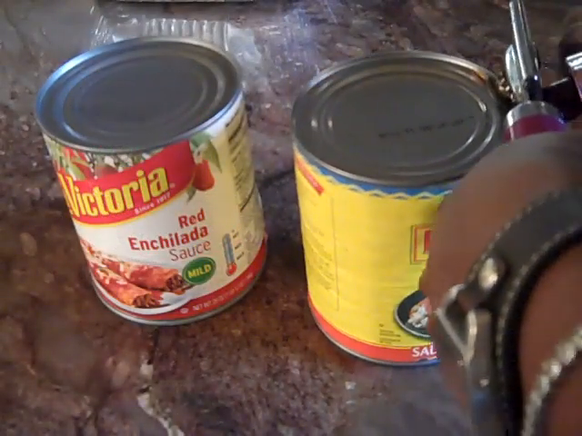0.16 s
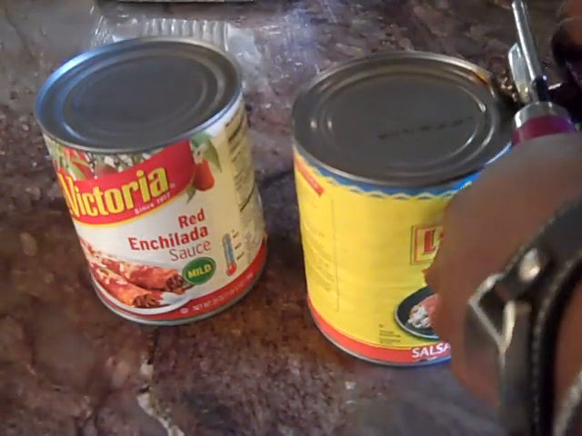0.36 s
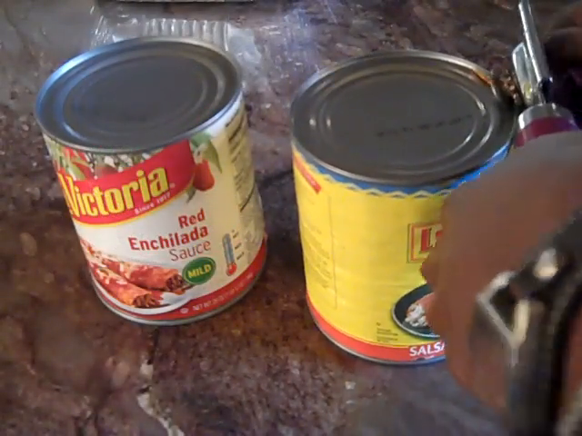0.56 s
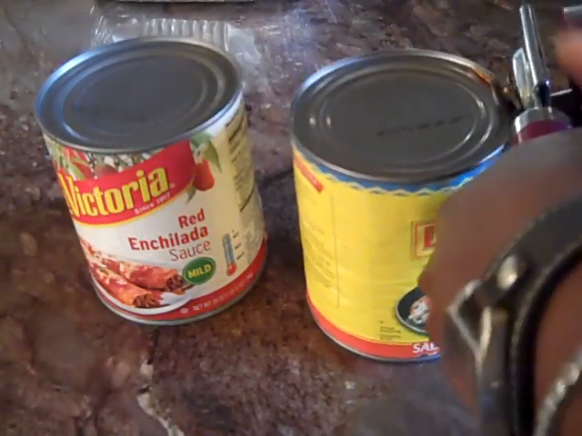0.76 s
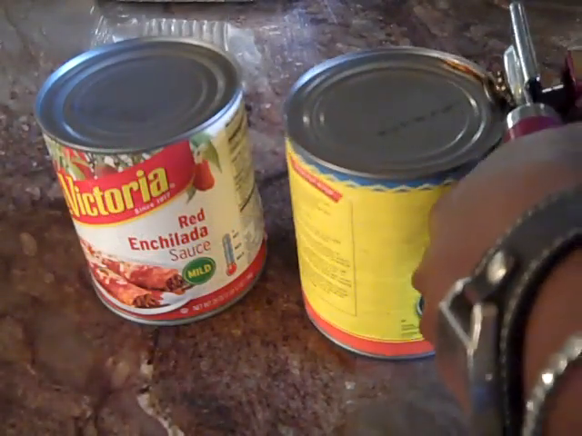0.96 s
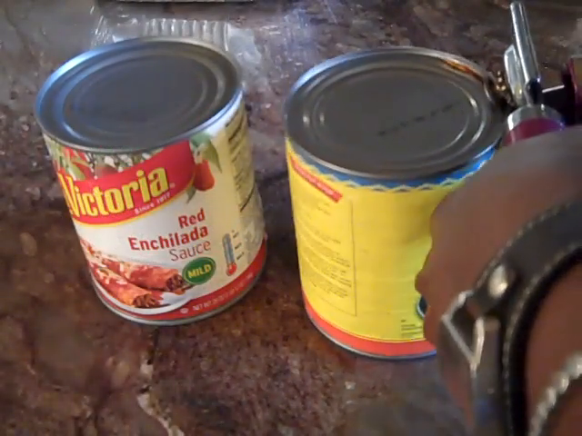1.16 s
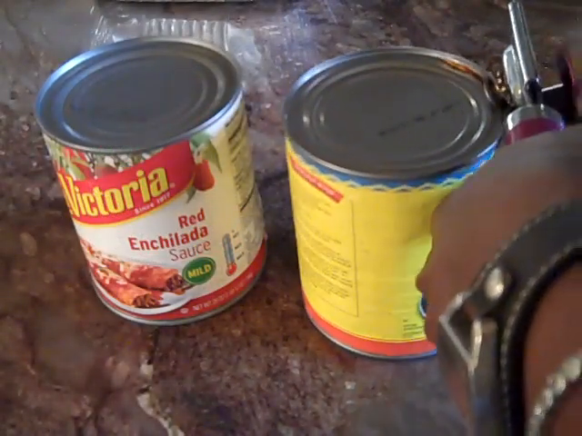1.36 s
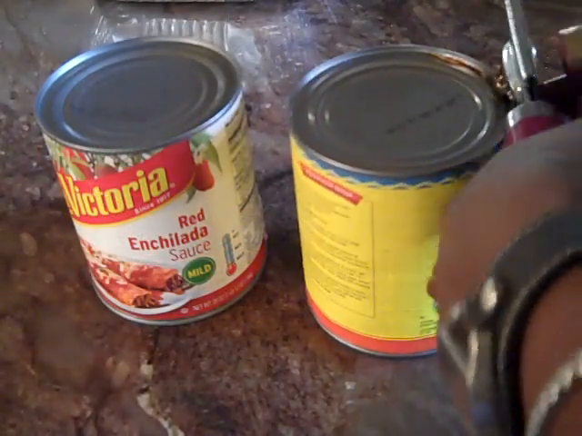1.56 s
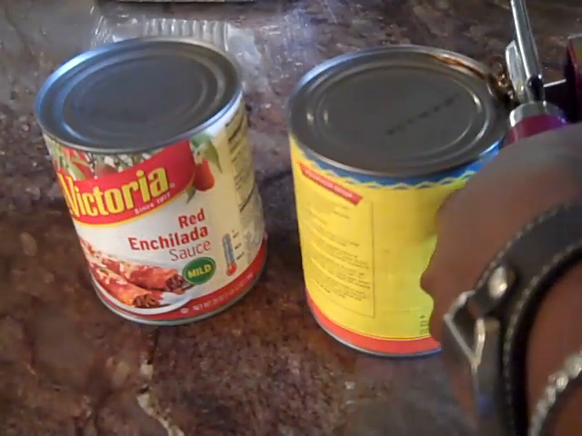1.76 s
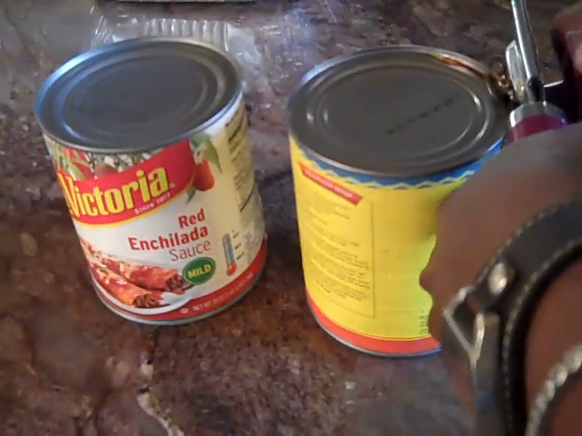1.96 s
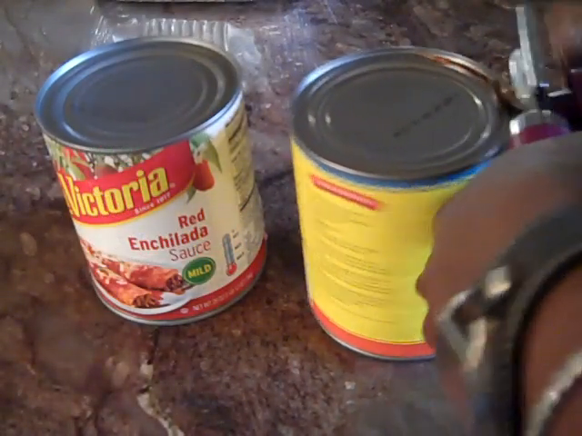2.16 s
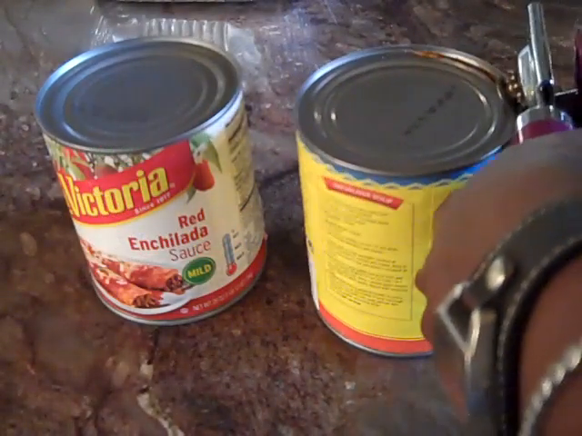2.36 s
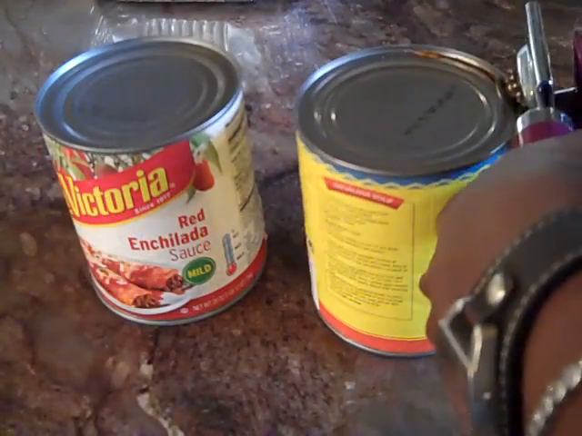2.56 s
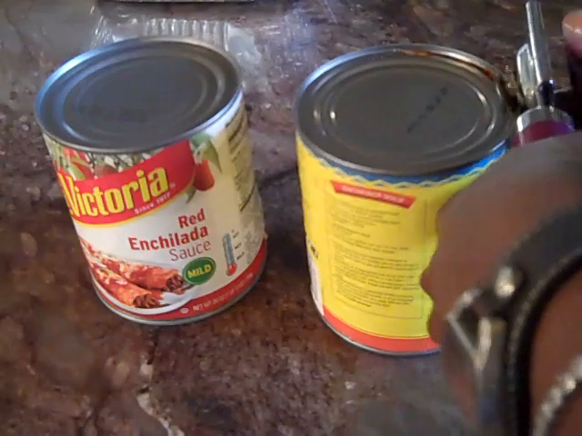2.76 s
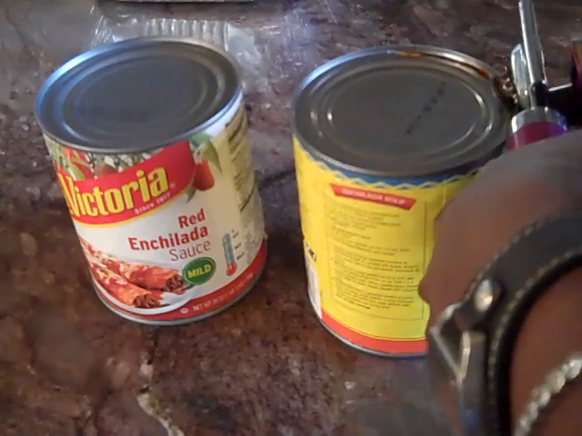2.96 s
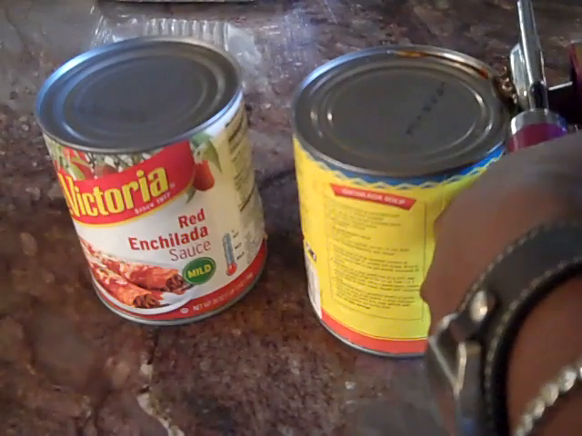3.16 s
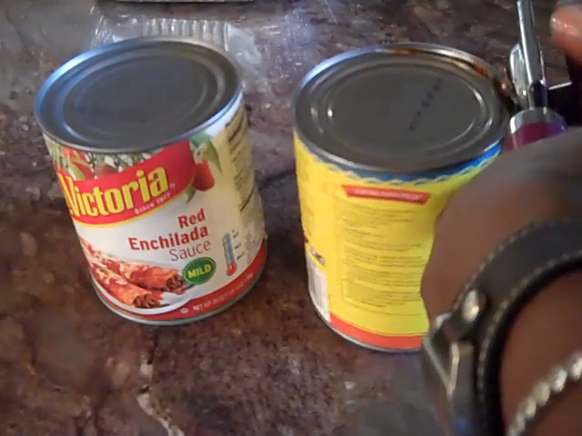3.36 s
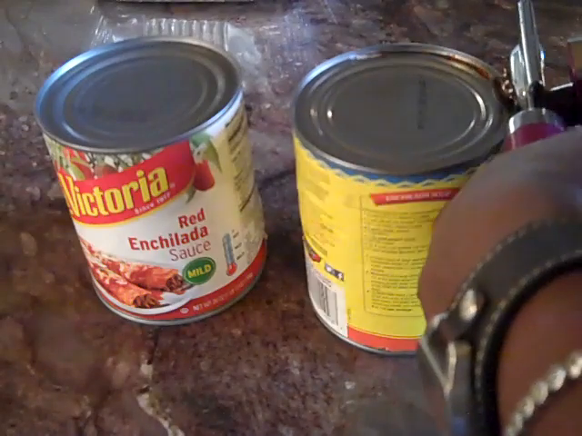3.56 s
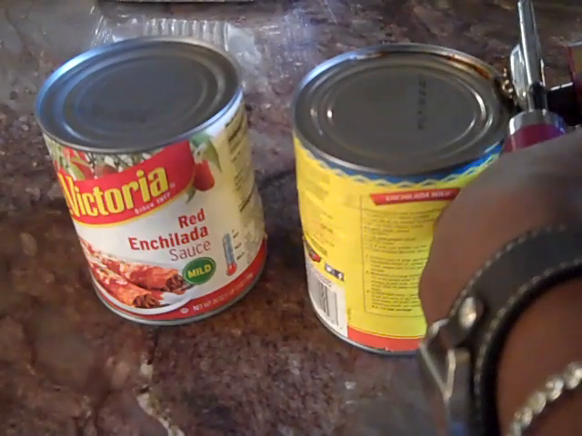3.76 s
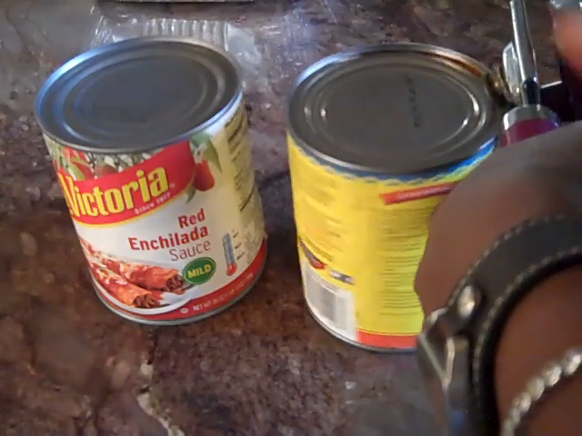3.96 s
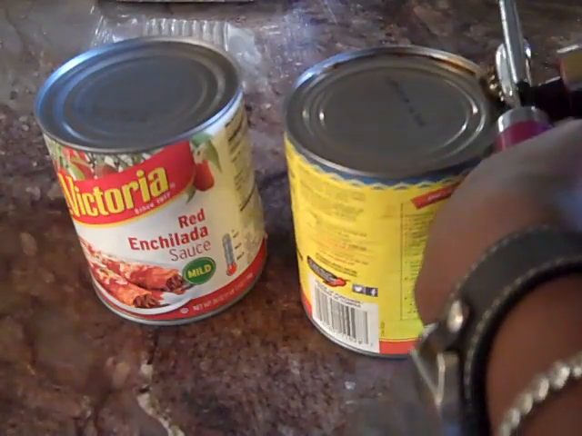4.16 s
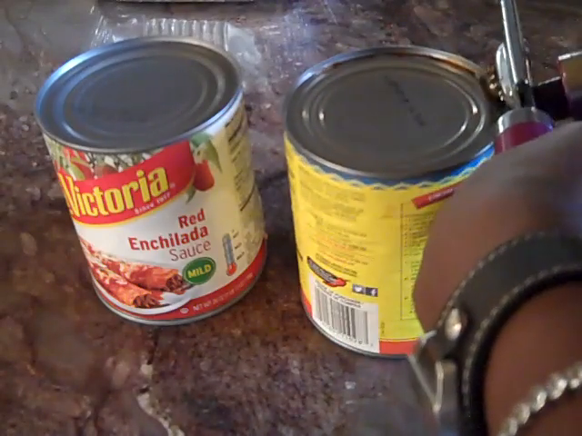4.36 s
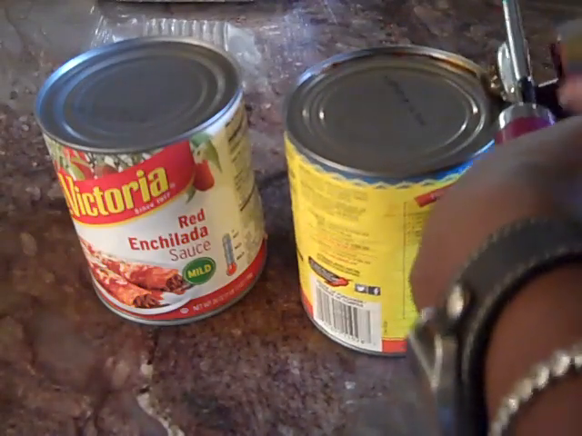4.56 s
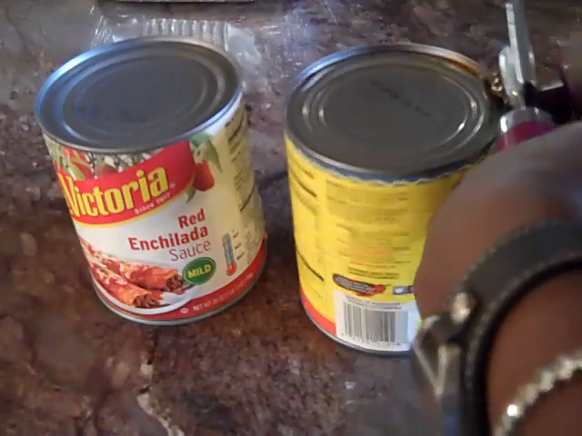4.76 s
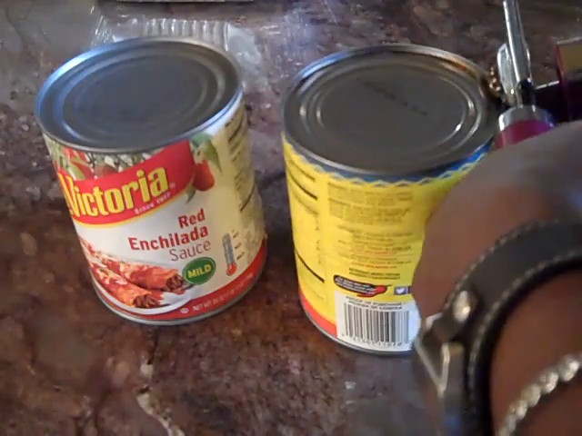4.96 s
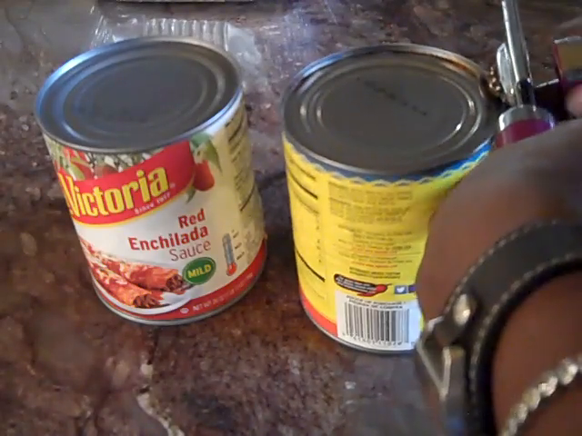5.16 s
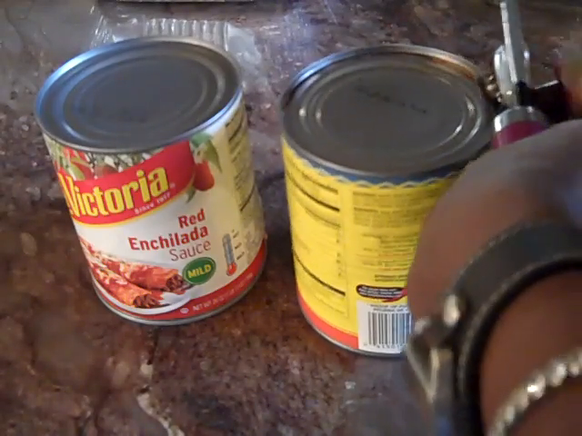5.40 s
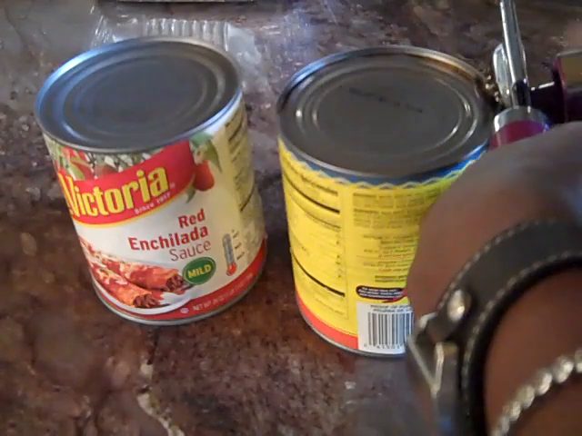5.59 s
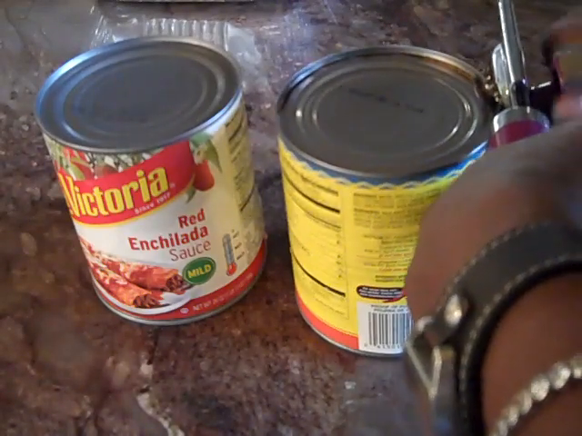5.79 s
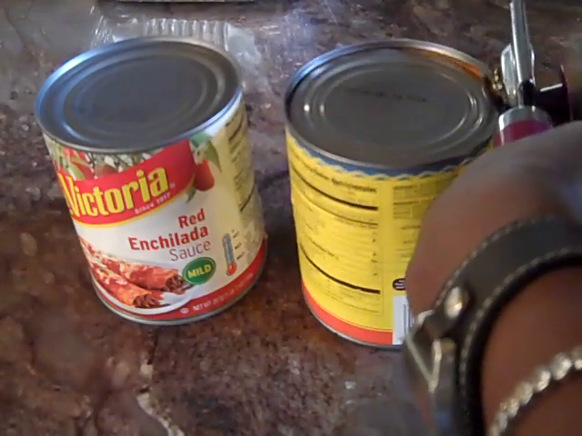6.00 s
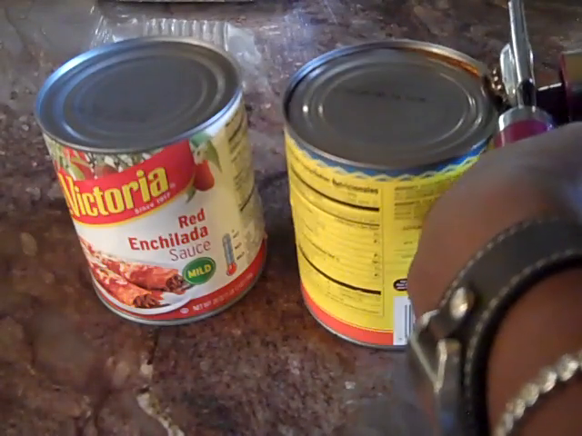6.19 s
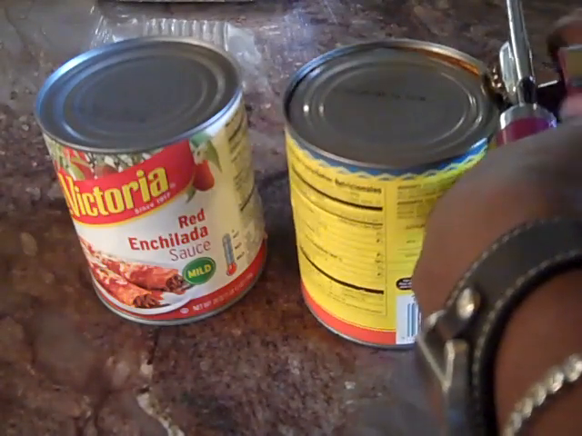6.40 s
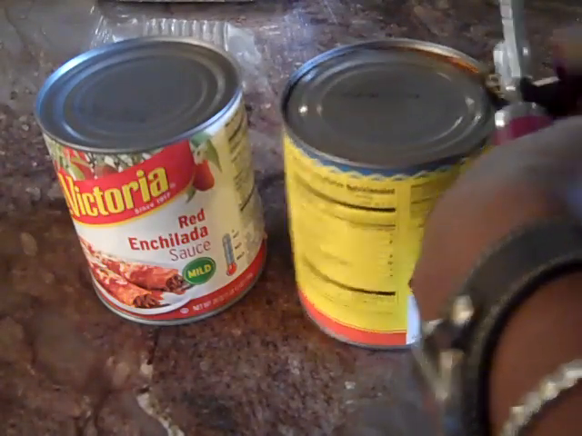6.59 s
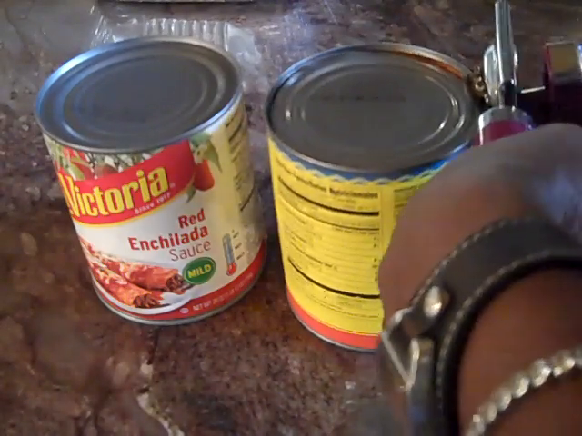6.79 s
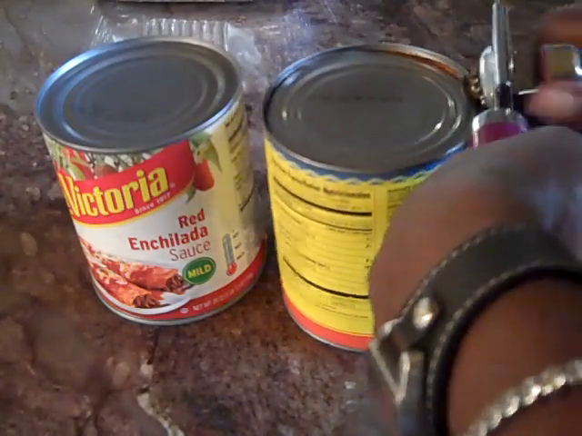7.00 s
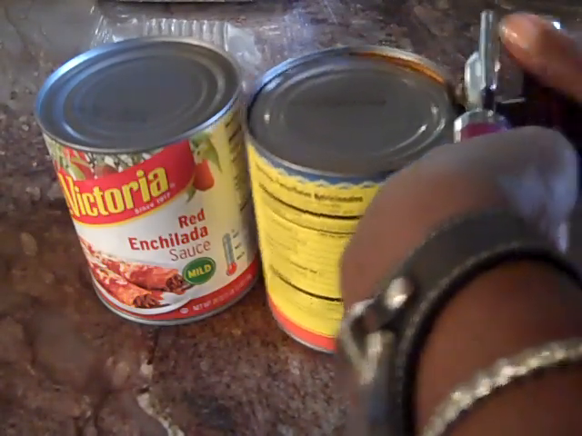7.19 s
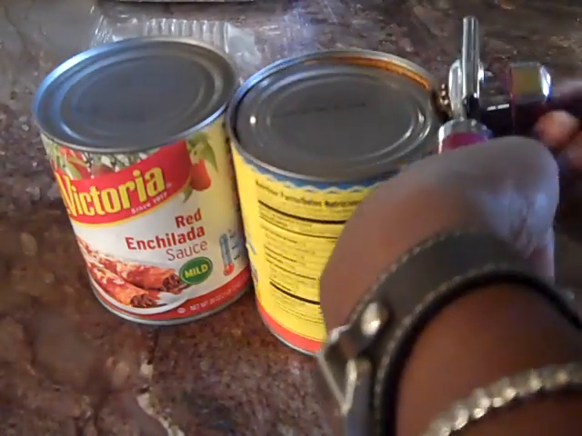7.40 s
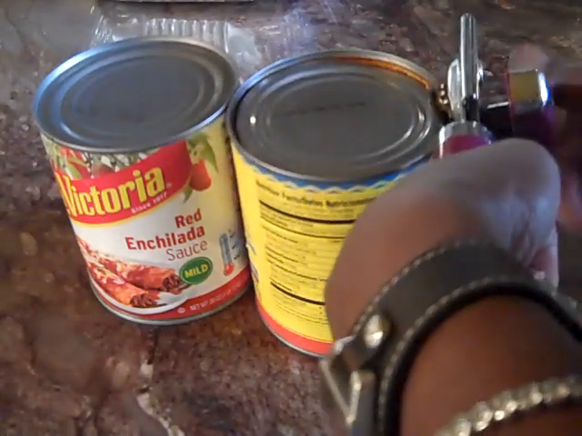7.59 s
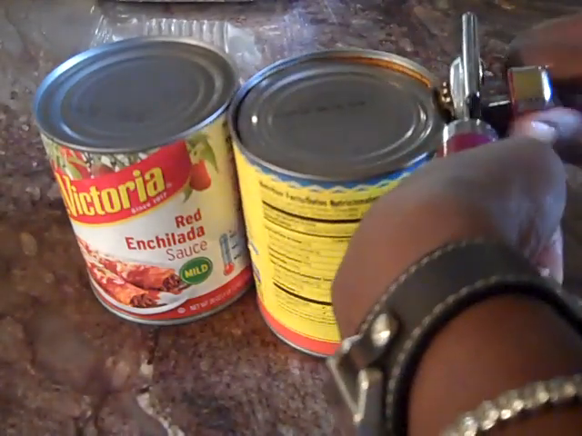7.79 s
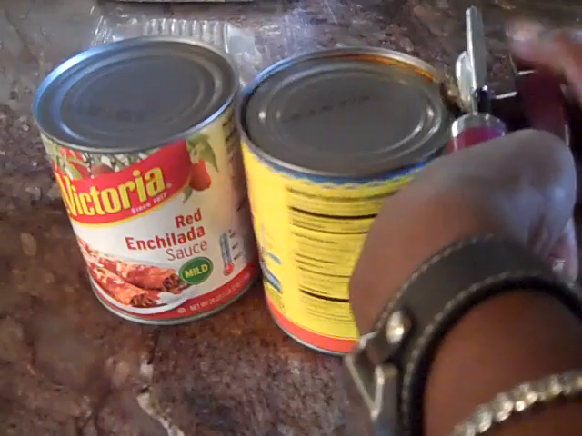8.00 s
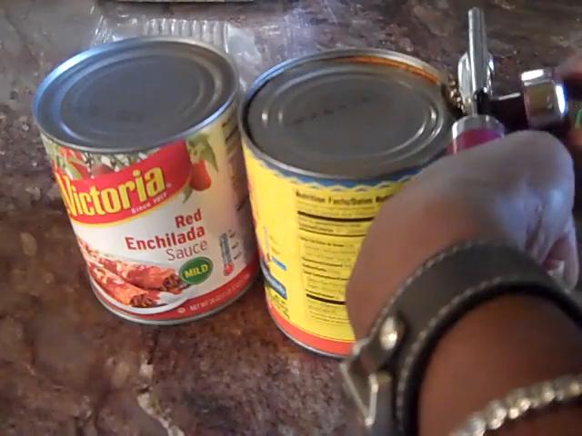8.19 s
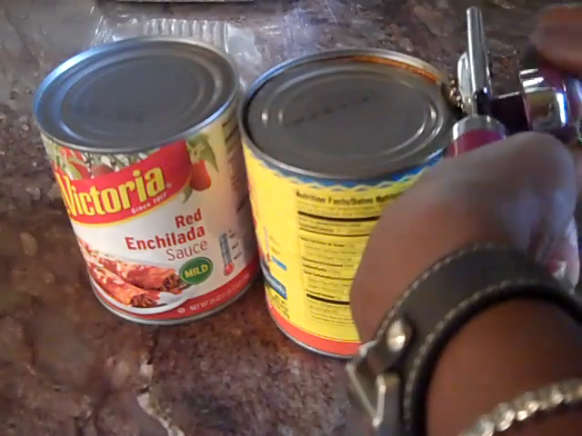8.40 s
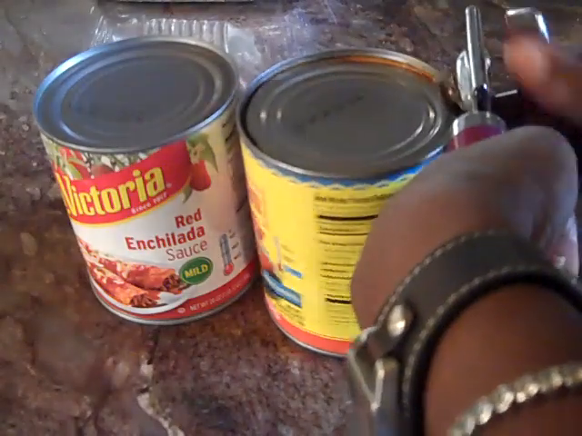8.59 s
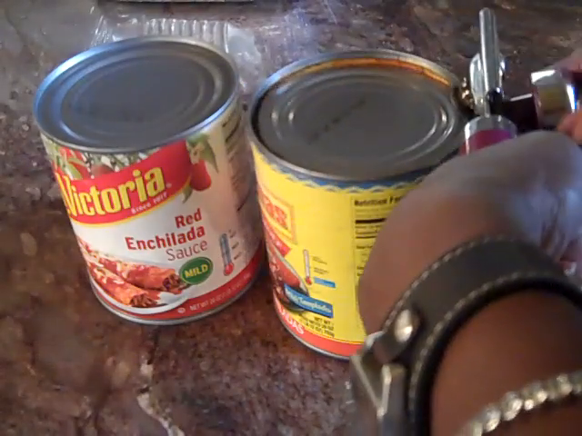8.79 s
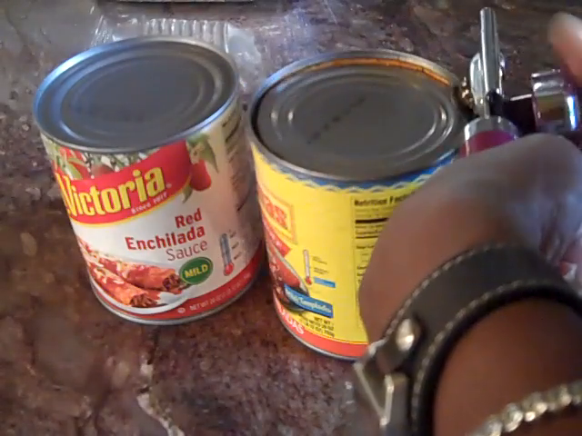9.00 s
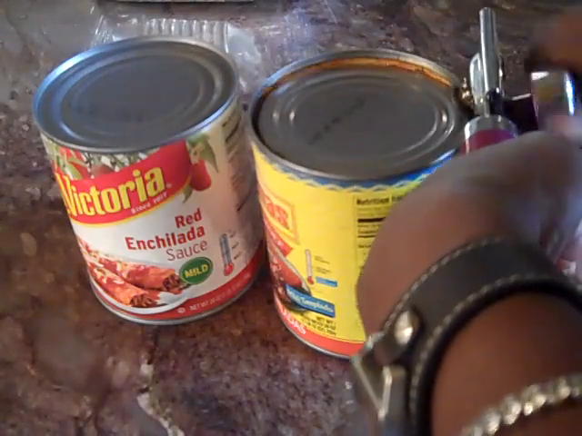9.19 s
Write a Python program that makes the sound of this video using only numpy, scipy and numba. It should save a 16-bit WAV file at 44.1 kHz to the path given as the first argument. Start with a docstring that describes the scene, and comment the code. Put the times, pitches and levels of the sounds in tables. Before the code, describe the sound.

A hand can opener is cranked round a full steel can in short scraping, ringing strokes with sharp gear snaps, close up in a humming kitchen.

```python
"""A hand can opener is cranked in fourteen short strokes round a full steel can on a stone counter, close to a phone.
The wheel tears along the rim in dense noisy slips and gear teeth snap over the seam, both ringing can and opener.
Loose parts tick, the can rocks in low thumps and the handle squeaks once; behind lies the air and hum of a kitchen.
Two microphone ports hear the near source unequally, with a short room tail and quick reflections."""
import sys
import numpy as np
from scipy import signal
from scipy.fft import rfft, irfft
from scipy.io import wavfile
from numba import njit

SR = 44100
rng = np.random.default_rng(int(sys.argv[2]) if len(sys.argv) > 2 else 0)


def generate_wav(sig):
    """Save sig (samples, or channels by samples) to the path in sys.argv[1] as 16-bit PCM at SR."""
    pcm = np.round(np.clip(np.atleast_2d(sig).T, -1, 1) * 32767).astype(np.int16)
    wavfile.write(sys.argv[1], SR, pcm)


N = 407925  # samples


def undb(db):
    """Decibels to gain."""
    return 10 ** (np.asarray(db) / 20)


def level(x, db):
    """Scale to an rms level in dB."""
    return x * undb(db) / np.sqrt(np.mean(x ** 2))


def on_log(table, hz, axis=1):
    """Read one column of a table along log frequency."""
    table = np.array(table)
    return np.interp(np.log(hz + 1), np.log(table[:, 0] + 1), table[:, axis])


@njit
def moving_mode(x, hz, width):
    """State-variable band-pass: a resonance whose centre may move, gain 1 there."""
    y, band_state, low_state = np.empty(len(x)), 0., 0.
    for i in range(len(x)):
        g, k = np.tan(np.pi * hz[i] / SR), width / hz[i]
        v = (band_state + g * (x[i] + 1e-18 - low_state)) / (1 + g * (g + k))
        band_state = 2 * v - band_state
        low_state += 2 * g * v
        y[i] = k * v
    return y


def mode(x, hz, width):
    """One fixed resonance, gain 1 at the centre."""
    return signal.lfilter(*signal.iirpeak(hz, hz / width, fs=SR), x)


def band(x, lo_hz, hi_hz):
    """Broad band-pass."""
    return signal.sosfilt(signal.butter(2, [lo_hz, hi_hz], "band", fs=SR, output="sos"), x)


def walk(rate):
    """Random values around zero joined by straight lines, rate knots a second."""
    knots = rng.standard_normal(int(N / SR * rate) + 2)
    return 1.13 * np.interp(np.arange(N) * rate / SR, np.arange(len(knots)), knots)


def burst(decay_s):
    """A sharp blow of noise with a short chattering tail."""
    t = np.arange(int(.04 * SR)) / SR
    envelope = np.exp(-t / decay_s) + 1.22 * np.exp(-t / 0.000099)
    return rng.standard_normal(len(t)) * envelope / 3


# Spectrum of the kitchen air. Each row: frequency in Hz, relative density in dB per Hz.
AIR_SPECTRUM = [(12, -27.5), (20, -6), (204, -3.5), (443, -11.5), (481, -16.5), (617, -14), (671, -15.5),
                (2030, -27.5), (8080, -36.5), (13700, -42.5), (14800, -52)]
# How alike the two ports hear the air. Each row: frequency in Hz, squared correlation from 0 to 1.
AIR_LIKENESS = [(60, 0.71), (130, 1), (290, 0.3), (630, 1), (1370, 0), (3010, 0.1), (6580, 0), (14400, 0)]
# Lean of the background to one port. Each row: frequency in Hz, left minus right in dB.
BACKGROUND_SIDE = [(60, -9), (110, -3), (200, -0.5), (370, -0.5), (690, -1.5), (1260, 0.0), (2320, 1),
                   (4260, -1), (7830, 1.5), (14400, 0.5)]
# Appliance motor. Each row: frequency in Hz, width in Hz, level in dB rms before the lean.
MOTOR_HUM = [(54.95, 8, -66.5), (124, 30, -63.5), (472.9, 7.1, -64)]
AIR_DB = -53.5  # rms before its slow drift and the lean


def kitchen():
    """Noise shaped as room air, alike at both ports in the bass; narrow noise bands make a wavering motor hum."""
    hz = np.fft.rfftfreq(N, 1 / SR)
    alike = np.sqrt(np.clip(on_log(AIR_LIKENESS, hz), 0, 1))
    mid, side = rfft(rng.standard_normal((2, N)))
    opposite = np.array([[1], [-1]])
    pair = np.sqrt(1 + alike) * mid + np.sqrt(1 - alike) * side * opposite
    air = level(irfft(pair * undb(on_log(AIR_SPECTRUM, hz)), N), AIR_DB) * undb(walk(2.99))
    # fingers shift on the grips: a faint bright rustle comes and goes at the left port
    rustle = band(rng.standard_normal(N), 7000, 11000) * undb(7.3 * walk(19.0))
    air[0] += level(rustle, -76)
    hum = sum(level(mode(rng.standard_normal(N), f, width), db) for f, width, db in MOTOR_HUM)
    lean = undb(on_log(BACKGROUND_SIDE, hz) * opposite / 2)
    return irfft(rfft(air + hum) * lean, N)


# Faint ticks of loose parts. Each row: start in seconds, level in dB before make-up gain, pitch in Hz.
LOOSE_TICKS = [(0.062, -47, 6700), (0.189, -45.5, 2140), (0.392, -57, 7550), (0.494, -55, 6600),
               (0.6659, -51, 7400), (1.1897, -50, 2020), (2.672, -51, 2550), (4.3645, -58, 2170),
               (5.1936, -52, 2600), (5.2613, -47, 6500), (6.3779, -55.5, 7860), (8.3469, -51, 3480)]


def ticks():
    """Bare clicks of one colour each, the listed ones and sixty fainter ones at random moments."""
    out = np.zeros(N + SR)
    chance = rng.random((60, 3))
    faint = np.c_[chance[:, 0] * N / SR, -62 + 8 * chance[:, 1], 6000 + 4000 * chance[:, 2]]
    for at, db, hz in [*LOOSE_TICKS, *faint]:
        click = burst(0.0025)
        coloured = mode(click, hz, 800) + .08 * band(click, 2000, 8300)
        out[int(at * SR):][:len(click)] += undb(db + 19.0) * coloured  # make-up for the narrow mode
    return out[:N]


# The can rocks on the counter. Each row: start in seconds, relative level in dB, pitch in Hz.
CAN_ROCKS = [(2.925, -45, 80.1), (4.799, -47.5, 101.5), (6.069, -44.5, 67.4), (6.671, -46.5, 68.8),
             (7.399, -47.5, 80), (8.169, -44.5, 82)]


def thumps():
    """A few damped low cycles of the counter under each rock of the can."""
    out = np.zeros(N + SR)
    t = np.arange(int(.25 * SR)) / SR
    envelope = np.e * t / 0.0266 * np.exp(-t / 0.017)
    for at, db, hz in CAN_ROCKS:
        out[int(at * SR):][:len(t)] += undb(db) * envelope * np.sin(2 * np.pi * hz * t)
    return out[:N]


# The handle creeps on its rivet. One row: centre in seconds, spread in seconds, pitch in Hz,
# level in dB rms before the swell.
RIVET_SQUEAK = (.32, .045, 2270, -66)


def squeak():
    """Narrow noise under one brief bell-shaped swell."""
    at, spread_s, hz, db = RIVET_SQUEAK
    swell = np.exp(-((np.arange(N) / SR - at) / spread_s) ** 2)
    return level(mode(rng.standard_normal(N), hz, 64), db) * swell


def slips(rate, spread_db):
    """Stick-slip of steel on steel: dense short chatters of unequal size over a fine hiss, in uneven runs."""
    size = undb(spread_db * np.minimum(rng.exponential(size=N), 4))
    impulses = (rng.random(N) < rate / SR) * size
    force = signal.lfilter([1], [1, -np.exp(-1 / (.0012 * SR))], impulses)  # each slip dies in 1.2 ms
    return level((level(force, 0) + 0.84) * rng.standard_normal(N) * undb(2 * walk(45)), 0)


def sheet(x, t60_s):
    """Thin steel has countless weak modes: a brief dense ring after the direct click."""
    t = np.arange(int(.12 * SR)) / SR
    response = level(rng.standard_normal(len(t)) * undb(-60 * t / t60_s), 0) / np.sqrt(len(t))
    return 0.6 * x + signal.fftconvolve(x, response)[:N]


BITE_S, BITE_FROM_DB = 0.023, 23.5  # rise to the bite, from this far below it
RELEASE_DB_PER_S = 801
DULLING_DB = -2  # the opener goes quiet first when the hand eases off


def stroke(t, at, swell_s, fall_s, peak_db, bite_db, end_db, bright_db):
    """The wheel bites, swells to its peak, sags and lets go; gains for can and opener."""
    peak, end = at + max(swell_s, BITE_S + .005), at + swell_s + fall_s
    below_peak_db = np.array([bite_db + BITE_FROM_DB, bite_db, 0, end_db, end_db + .1 * RELEASE_DB_PER_S])
    db = np.interp(t, [at, at + BITE_S, peak, end, end + .1], peak_db - below_peak_db)
    can = undb(db) * (t > at) * (t < end + .1)
    easing = np.clip((t - peak) / fall_s, 0, 1)
    return np.array([can, can * undb(bright_db + DULLING_DB * easing)])


# Turns of the crank. Each row: start in seconds, swell in seconds, fall in seconds, relative peak in dB,
# bite and end in dB below the peak, opener against the can in dB, low lid ring in Hz and dB,
# high lid ring in Hz and dB, rim ring in Hz, ring of the can wall in dB.
CRANK_TURNS = [(0.781, 0.16, 0.092, -38, 6.1, 2.4, -3, 680, -2.5, 1347, -4, 2320, -5),
               (1.47, .11, 0.042, -32, 15.2, 4.2, -4, 680, 5.5, 1240, -8.5, 2100, 0),
               (2.174, 0.044, 0.13, -32.5, 4, 6.3, -3, 786, 6.5, 1273, 2.5, 2590, -1),
               (2.788, 0.1, 0.052, -29.5, 11.5, 13, -7, 766, -7, 1240, -21, 2090, 2),
               (3.389, 0.1, 0.067, -26.5, 9, 6.2, -4.5, 760, -5, 1390, -11.5, 2585, 6.5),
               (4.023, .11, 0.062, -35, 1.3, 1.1, -3, 916, 0.5, 1184, -7, 2410, 5),
               (4.681, 0.15, 0.041, -29.5, 3.4, 7.4, -2, 1015, 7, 1400, -6.5, 3044, 0),
               (5.331, 0.077, .11, -31.5, 5.7, 5.2, -5.5, 1130, -12.5, 1480, -5.5, 2044, 4),
               (5.927, 0.099, 0.082, -27.5, 9.7, 14, 1, 1190, -0.5, 1614, 1.5, 1980, 5),
               (6.529, 0.12, 0.037, -30, 14.7, 18, -4.5, 1068, 1.5, 1515, -7, 2217, -3),
               (7.26, 0.045, 0.066, -27, 18, 3.3, -8, 1050, 5.5, 1420, -10, 1920, -2),
               (7.395, 0.041, 0.029, -29, 9.6, 8, -11, 798, -10, 1260, -9, 1954, -6),
               (7.978, 0.14, 0.038, -31, 12, 11, -6.5, 1130, 7.5, 1470, -4, 2650, -0.5),
               (8.623, 0.12, 0.069, -31.5, 12.2, 3.1, -7, 930, 4, 1438, 1.5, 1980, 2)]
# The wheel brushes the rim between cuts. Each row: start in seconds, length in seconds,
# relative level in dB, opener against the can in dB.
RIM_BRUSHES = [(0.656, 0.1, -61, -3), (2.083, 0.064, -52.5, 1.5), (7.11, 0.14, -59.5, -0.5),
               (8.843, 0.073, -59, -25)]


def tearing(t):
    """One stream of slips, shaped by every stroke and brush, drives can and opener."""
    gains = sum(stroke(t, *row[:7]) for row in CRANK_TURNS)
    for at, length_s, db, opener_db in RIM_BRUSHES:
        gains = gains + stroke(t, at, length_s / 2, length_s / 2, db, 0, 0, opener_db)
    can_gain, opener_gain = gains
    tear = slips(350, 4.03)
    return tear * can_gain * undb(-3), tear * opener_gain * undb(-1.5)


# Teeth snapping over the seam. Each row: start in seconds, relative opener level in dB,
# can against it in dB, pitch in Hz of the struck part.
SEAM_SNAPS = [(0.7741, -24.5, 2, 6260), (0.8589, -25, -1.5, 2230), (0.8949, -25.5, -8, 6100),
              (0.9153, -27, 5.5, 7460), (0.9311, -28.5, -21, 2200), (0.9532, -27.5, -5, 2520),
              (1.0229, -34, -1, 3570), (1.5808, -31, 7, 2130), (2.1799, -24.5, -5, 2400),
              (2.2039, -20.5, -1.5, 7660), (2.3092, -32.5, 8, 2580), (2.9522, -39, -7, 7400),
              (3.398, -44.5, 8, 3690), (3.4131, -36, 5, 3690), (3.4411, -22.5, 1, 7220),
              (3.4665, -22, -1, 2700), (4.135, -22.5, 0.5, 7550), (4.1944, -33, 6.5, 1900),
              (4.6882, -30.5, 7.5, 7400), (4.7371, -8.5, -14, 7610), (4.7626, -17.5, -10, 7600),
              (4.8174, -26.5, 6.5, 7100), (5.3403, -32, -1, 1500), (5.4191, -29, -22, 3670),
              (5.5009, -33.5, -18, 2060), (5.9384, -35, 1, 3650), (5.9968, -9, -4, 7270),
              (6.0177, -20, -1, 3830), (6.0432, -20.5, -4, 3840), (6.6293, -27.5, -17, 2270),
              (7.2454, -40.5, 6.5, 2630), (7.2654, -46.5, 16.5, 2960), (7.2838, -26, 2.5, 2020),
              (7.3163, -25, -3, 2020), (7.3394, -20.5, -3, 6530), (7.4071, -31.5, -9, 7950),
              (8.0885, -27.5, -8, 2760), (8.1132, -39, 14.5, 7600), (8.1878, -29, -17, 8040),
              (8.6238, -42, -1.5, 2040), (8.654, -38, 2, 1470), (8.7111, -19.5, -29, 3770),
              (8.738, -22.5, 6, 3700), (8.7534, -21, -19, 5630), (8.7715, -21, 3.5, 7400),
              (8.8877, -27.5, -14, 1600)]


def snaps():
    """Each tooth is a noise blow to can and opener, plus a crack of the part that it strikes."""
    can, tool, crack = np.zeros((3, N))
    for at, db, can_db, hz in SEAM_SNAPS:
        i, blow = int(at * SR), burst(0.0049)
        span = slice(i, i + len(blow))
        tool[span] += undb(db + 3.5) * blow
        can[span] += undb(db + can_db + 5.5) * band(blow, 600, 9000)
        crack[span] += undb(db + 20.0) * mode(blow, hz, 250)
    return can, tool, crack


# Low lid, high lid, rim and two gear rings, in this order. Each row: width in Hz, gain in dB.
RING_WIDTHS = [(80.3, 12.5), (59, 18), (70, 14), (150, 13), (120, 9)]
# Gear rings. Each row: frequency in Hz before detuning, level in dB.
GEAR_TONES = [(3740, -2.5), (5900, -4.5)]
GEAR_DETUNE = .015  # typical share, new at every turn
# the high lid ring leads a turn and the low one takes over around its peak, the more so the longer the cut
HANDOVER_DB_PER_S, HANDOVER_S = 1.0351, 0.037
SAG = 0.034  # the low ring sinks from this share above its pitch to as much below
RIM_DB, RIM_SPREAD_DB = -2, 2.5


def lid_rings(t, now, can_drive, tool_drive):
    """As the cut grows, lid, rim and gear resonances take new pitches and levels from turn to turn."""
    turns, chance = np.array(CRANK_TURNS), rng.standard_normal((len(CRANK_TURNS), 3))
    low_hz, low_db, high_hz, high_db, rim_hz, _ = turns[now, 7:].T
    takeover = np.tanh((t - turns[now, 0] - turns[now, 1]) / HANDOVER_S)  # -1 before the peak, 1 after
    shift_db = HANDOVER_DB_PER_S * t * takeover
    rings = [(can_drive, low_hz * (1 - SAG * takeover), low_db + shift_db),
             (can_drive, high_hz, high_db - shift_db),
             (tool_drive, rim_hz, RIM_DB + RIM_SPREAD_DB * chance[now, 0])]
    for k, (hz, db) in enumerate(GEAR_TONES):
        rings.append((tool_drive, hz * (1 + GEAR_DETUNE * chance[now, k + 1]), db))
    out = np.zeros(N)
    for (drive, hz, db), (width, gain_db) in zip(rings, RING_WIDTHS):
        out += undb(db + gain_db + 2 * walk(23)) * moving_mode(drive, hz, float(width))
    return out


def ring(modes, drive):
    """The moving contact feeds each fixed mode more or less strongly."""
    norm = np.sqrt(sum(undb(db) ** 2 * width for _, width, db in modes) * np.pi / SR)
    return sum(undb(db + 2.8 * walk(12)) * mode(drive, hz, width) for hz, width, db in modes) / norm


# Modes of the full can; rows three and four are its wall.
# Each row: frequency in Hz, width in Hz, relative level in dB.
CAN_MODES = [(313, 11.7, -8.5), (360, 47, 0), (488, 13, 2), (516.4, 20, -3), (683, 21, 1), (810, 40, -0.5),
             (1072, 110, 1.5), (1368, 21, 0), (1578, 230, -13.5), (1786, 75, -14.5)]
# Modes of the opener. Each row: frequency in Hz, width in Hz, relative level in dB.
OPENER_MODES = [(2150, 230, -5.5), (2569, 23, -1), (3440, 110, -9.5), (4000, 23, -17), (4987, 97, -15),
                (5520, 98, -9), (6190, 720, -9.5), (7160, 220, -10), (7580, 58, -7.5), (8400, 49, -14.5),
                (9700, 53, -24.5)]


def opener():
    """Cutting wheel and gear on the rim of the can; tearing and snaps drive the same modes."""
    t = np.arange(N) / SR
    turns = np.array(CRANK_TURNS)
    now = np.searchsorted(turns[1:, 0] - .1, t)  # the next turn's rings are set 0.1 s ahead
    can_tear, tool_tear = tearing(t)
    can_snap, tool_snap, crack = snaps()
    can_drive, tool_drive = can_tear + can_snap, tool_tear + tool_snap
    bed = undb(6.5) * band(can_drive, 300, 1200) + undb(-1.0) * band(tool_drive, 1700, 6400)
    steel = lid_rings(t, now, can_drive, tool_drive) + sheet(bed, 0.14) + crack
    steel += undb(-9.5) * ring(CAN_MODES[:2], can_drive)
    steel += undb(turns[now, 12] - 12.5) * ring(CAN_MODES[2:4], can_drive)
    steel += undb(-5.5) * ring(CAN_MODES[4:], can_drive)
    steel += undb(-4.5) * ring(OPENER_MODES, tool_drive)
    # the blunt wheel gives little above its highest modes
    sheen = band(sheet(tool_drive, .04), 9500, 14000)
    return band(steel, 260, 8570) + undb(-27.5) * sheen


# Microphone ports of the phone, for a source on the left side.
# Each row: frequency in Hz, left minus right in dB, phase in radians by which left leads.
PORT_DIFFERENCE = [(59.95, -6.5, 0.5), (247.5, -1, -0.5), (700, -2.5, -0.12), (1400, 0, 0.44),
                   (2900, -0.5, 0.46), (4300, 0, -1.84), (5600, -4.5, 1.1), (7250, -0.5, 0.5),
                   (8110, 19, 7), (12500, 17, -11.5)]


def direct(near):
    """The close source reaches the two ports with unequal level and phase at each frequency."""
    hz = np.fft.rfftfreq(N, 1 / SR)
    right = undb(-on_log(PORT_DIFFERENCE, hz)) * np.exp(-1j * on_log(PORT_DIFFERENCE, hz, axis=2))
    ports = np.array([np.ones(len(hz)), right]) * 2 / (1 + abs(right))
    return irfft(rfft(near) * ports, N)


ROOM_T60_S, ROOM_DB, ROOM_DULL_HZ = 0.43, -13.5, 9000


def room(near):
    """Decaying noise as the room's tail, with its bass common to both ports, and quick near reflections."""
    t = np.arange(int(.7 * SR)) / SR
    common, own = rng.standard_normal(len(t)), rng.standard_normal((2, len(t)))
    tail = band(common, 67, 1500) + 0.38 * band(own, 360, ROOM_DULL_HZ)
    tail *= undb(-60 * t / ROOM_T60_S) * (t > .004)
    tail *= undb(ROOM_DB) / np.sqrt(np.mean(tail ** 2) * len(t))
    # counter and splashback answer at once, differently at each port
    nearby = undb(-25.5) * band(own, 1800, 14000) * undb(-60 * t / 0.023) * (t > .001)
    return signal.fftconvolve(near[None], tail + nearby, axes=1)[:, :N]


def scene():
    """Opener and small sounds close to the ports, their room, and the kitchen behind."""
    near = opener() + ticks() + thumps() + squeak()
    return direct(near) + room(near) + kitchen()


# The channel behind each microphone port, left then right.
# Each row: frequency in Hz, width in Hz, gain in dB of the added resonance.
PORT_CHANNELS = [(7686, 430, 3), (7750, 1100, -10)]
TOP_HZ = 14300


def record(dry):
    """The port channels lift a band of treble; the phone cuts the top."""
    heard = [x + undb(db) * mode(x, hz, width) for x, (hz, width, db) in zip(dry, PORT_CHANNELS)]
    return signal.sosfilt(signal.ellip(8, .2, 70, TOP_HZ, fs=SR, output="sos"), heard)


dry = scene()
out = record(dry)
generate_wav(out)
```